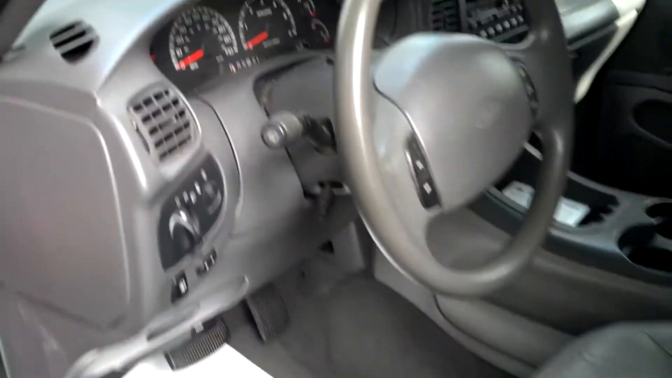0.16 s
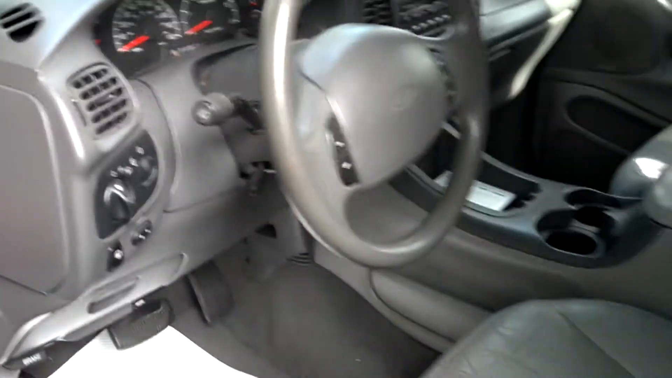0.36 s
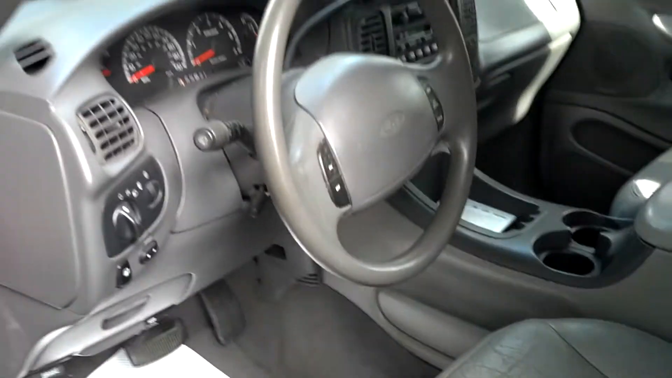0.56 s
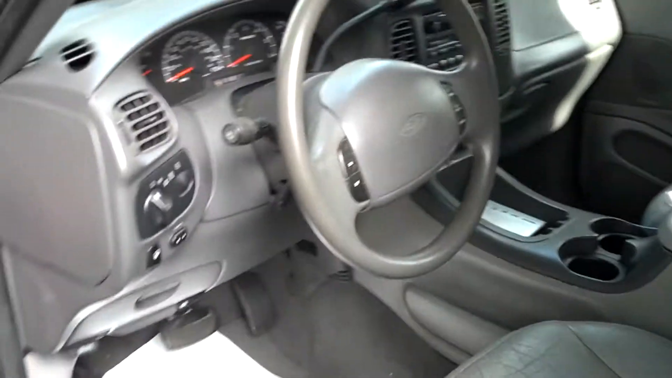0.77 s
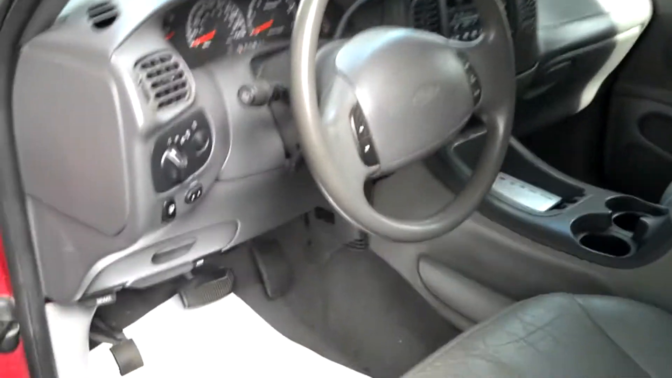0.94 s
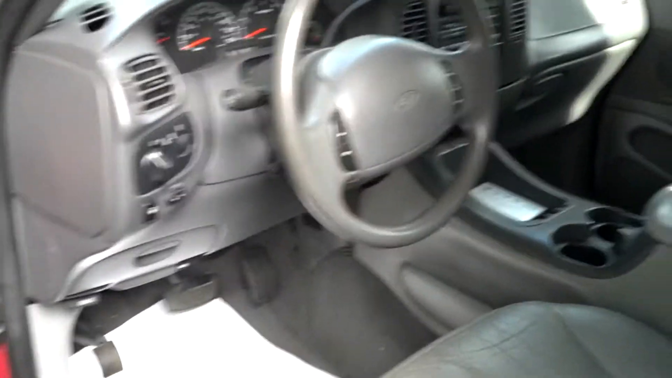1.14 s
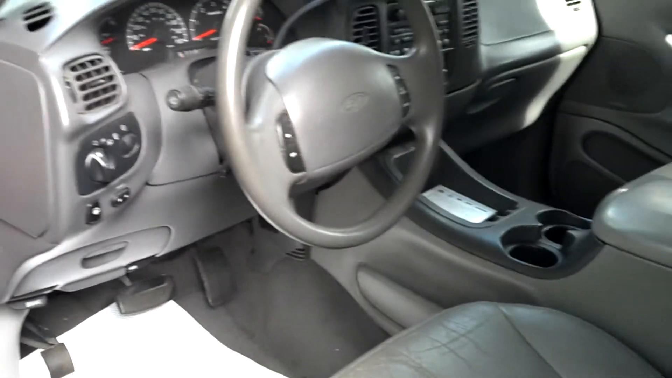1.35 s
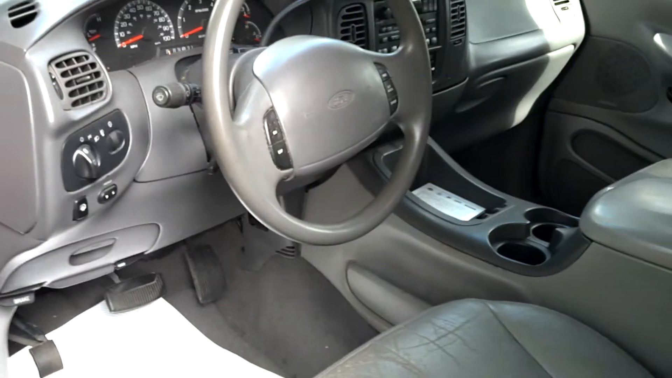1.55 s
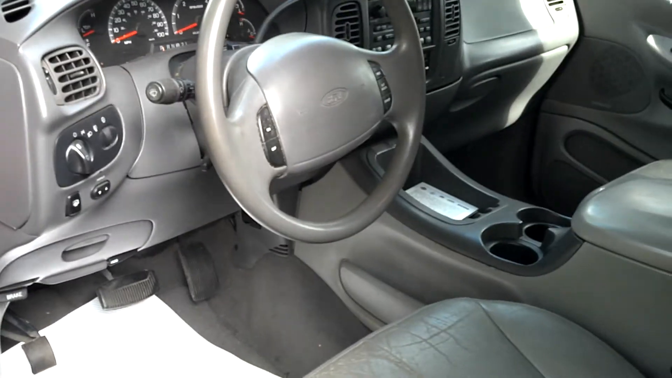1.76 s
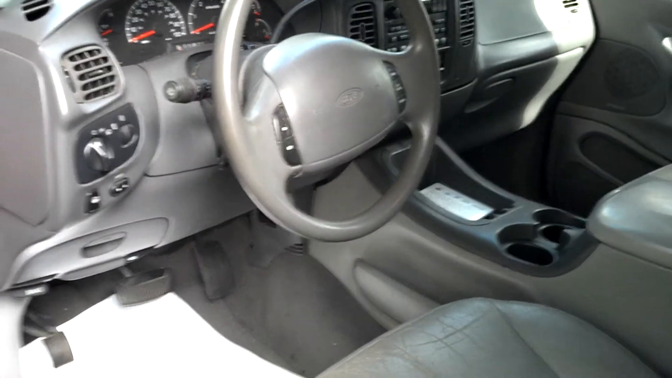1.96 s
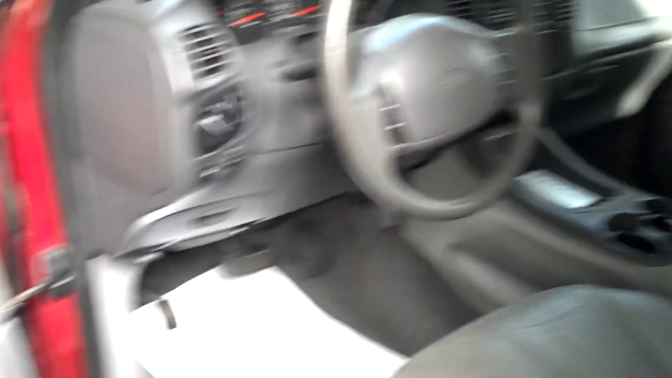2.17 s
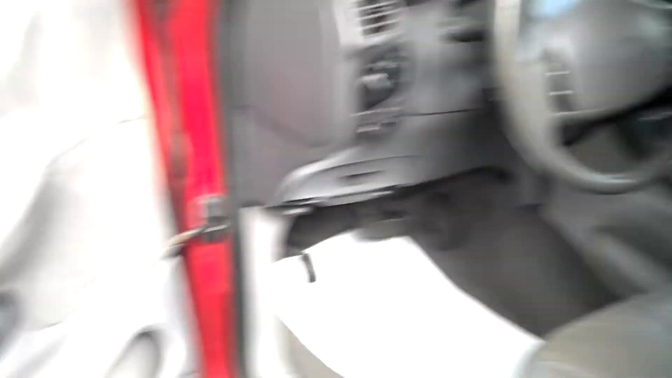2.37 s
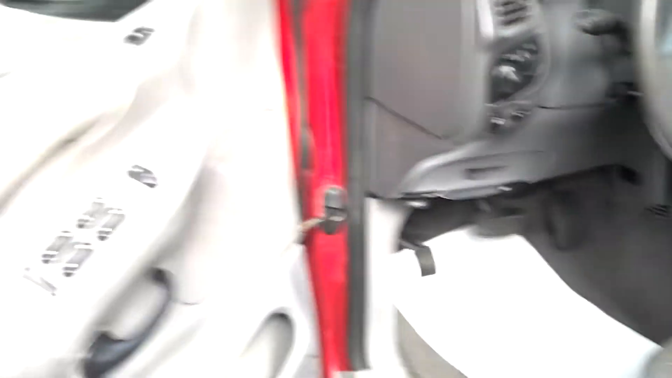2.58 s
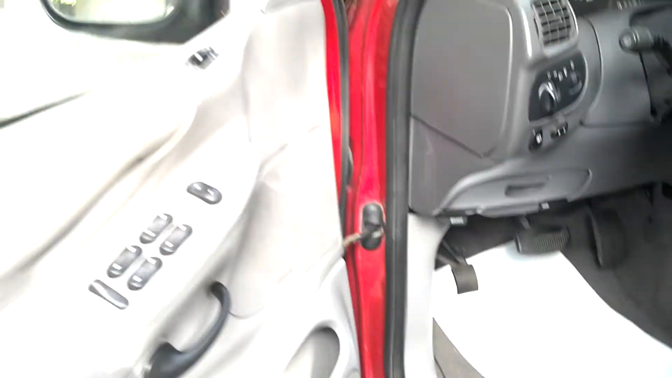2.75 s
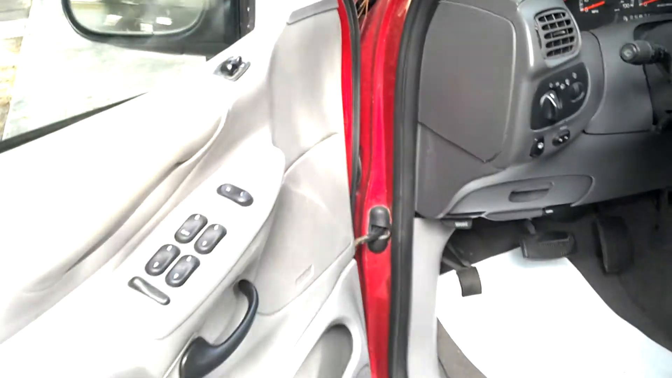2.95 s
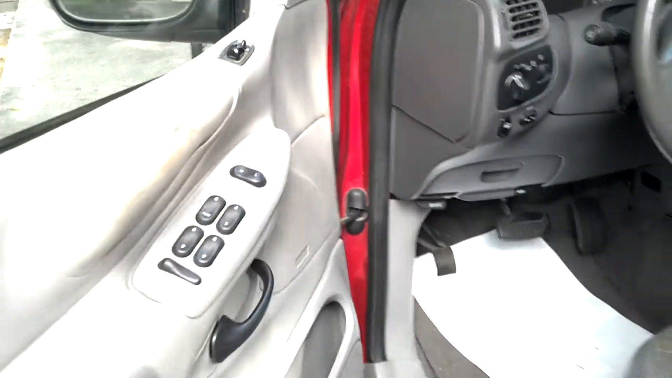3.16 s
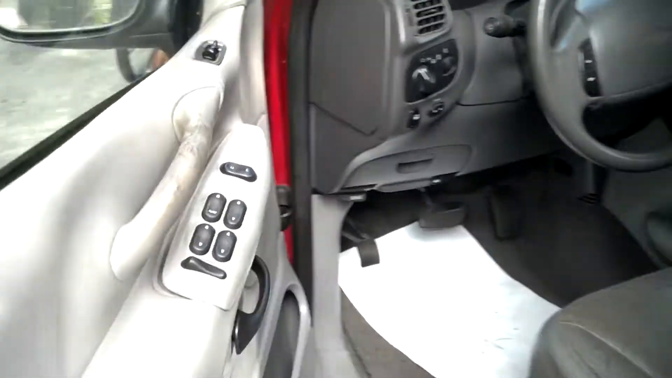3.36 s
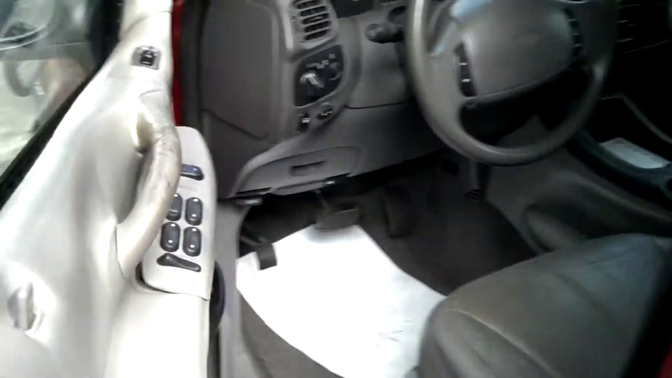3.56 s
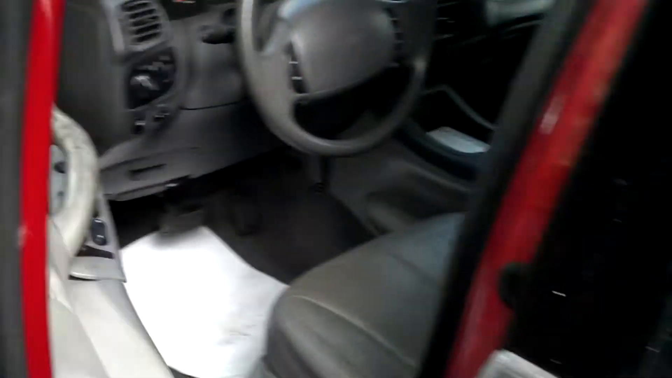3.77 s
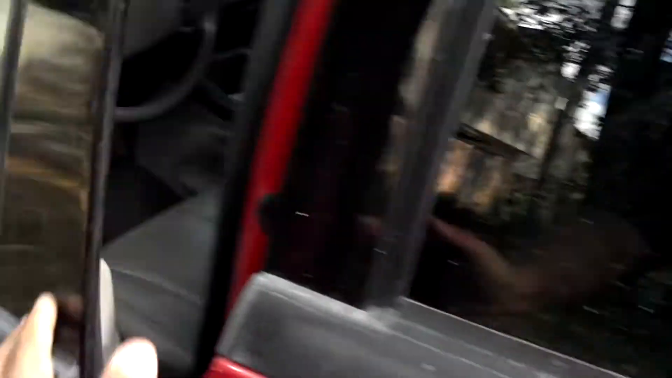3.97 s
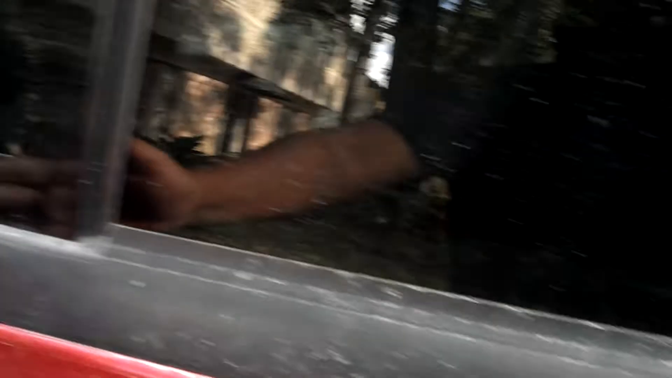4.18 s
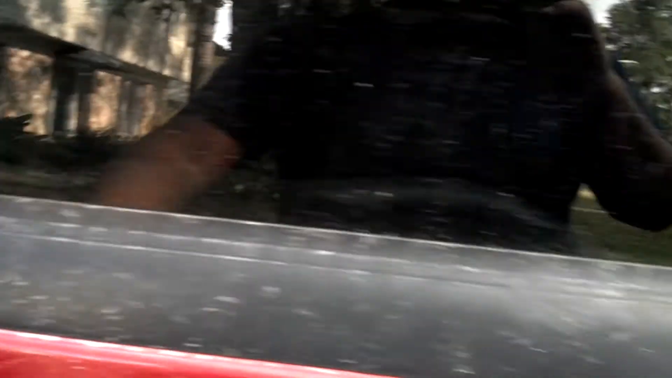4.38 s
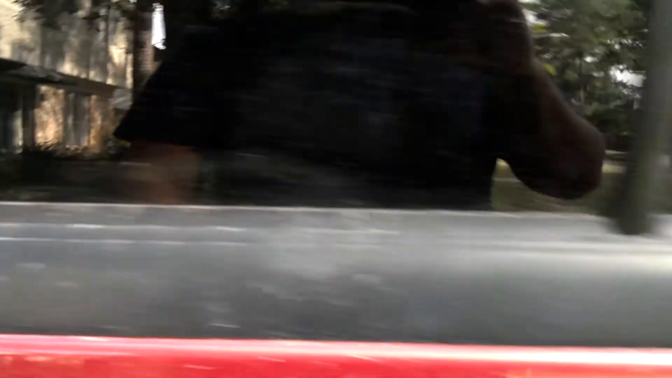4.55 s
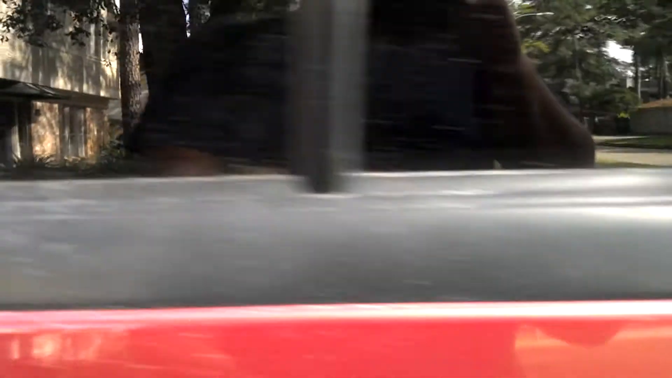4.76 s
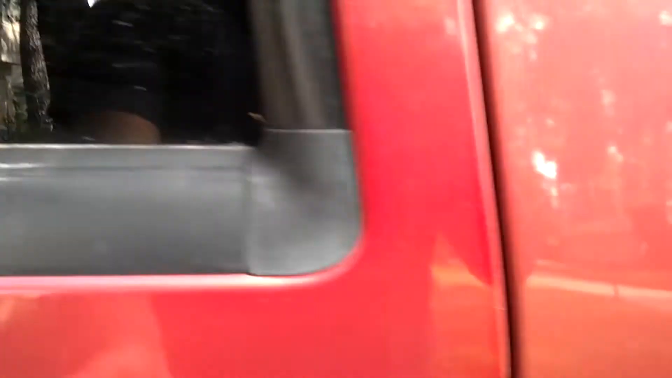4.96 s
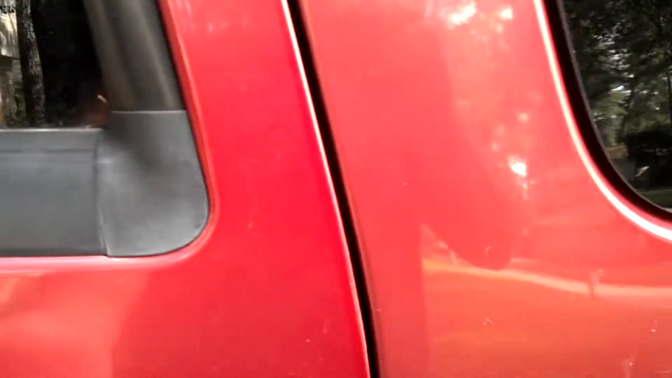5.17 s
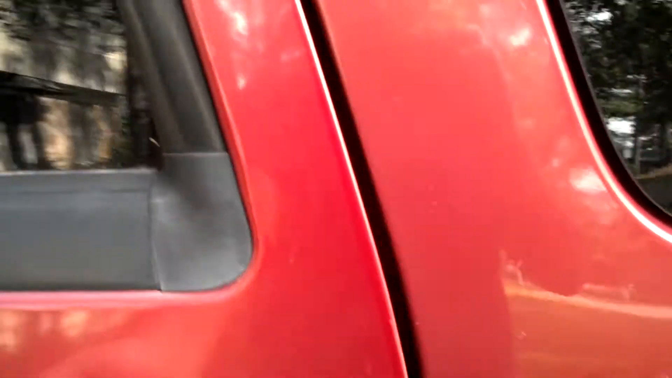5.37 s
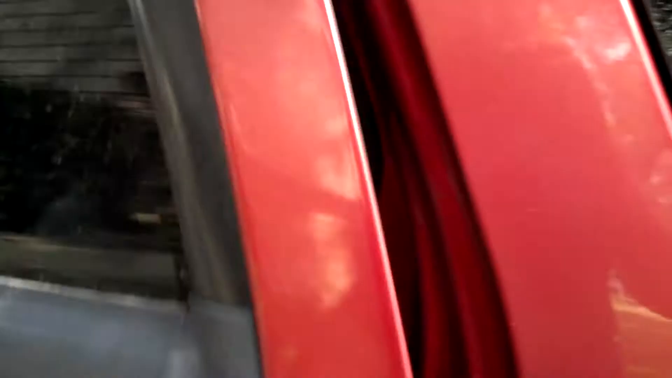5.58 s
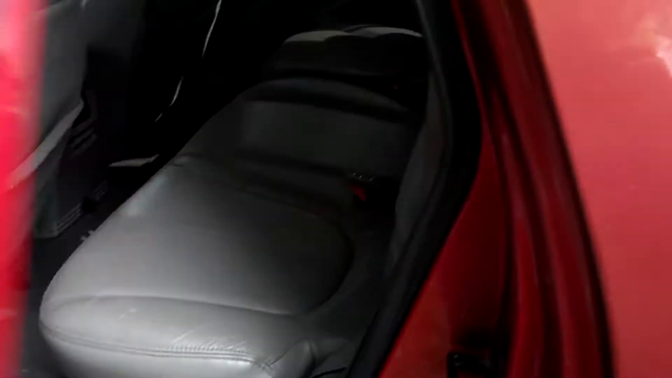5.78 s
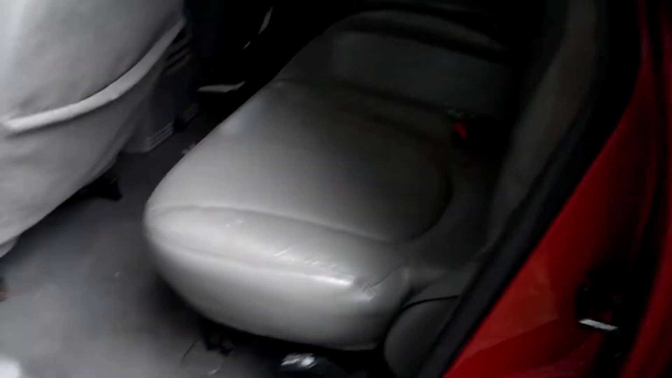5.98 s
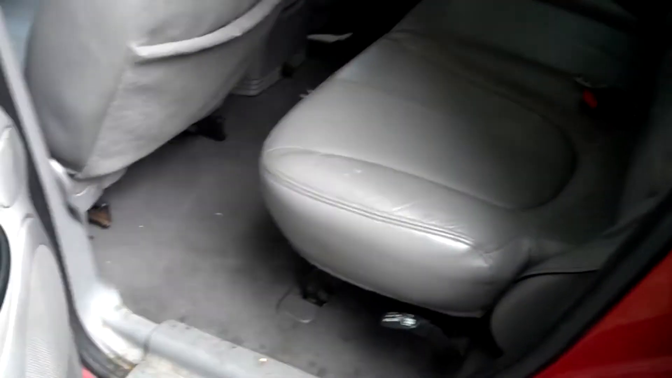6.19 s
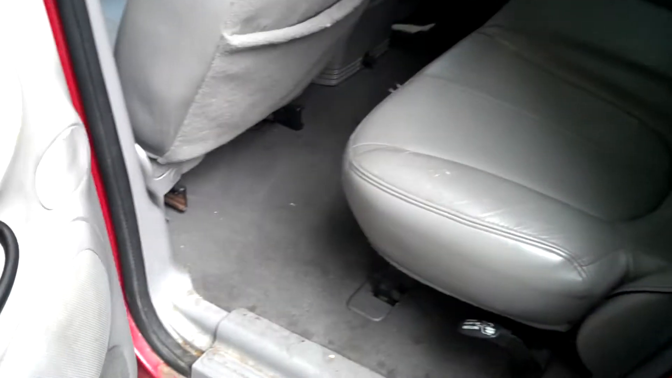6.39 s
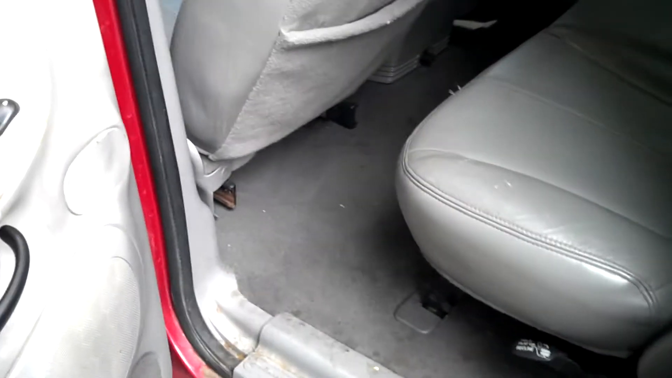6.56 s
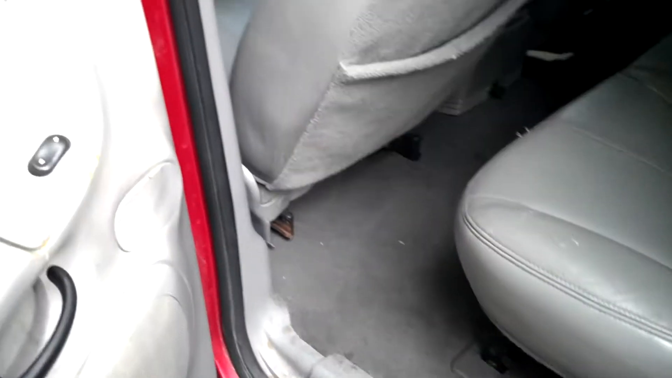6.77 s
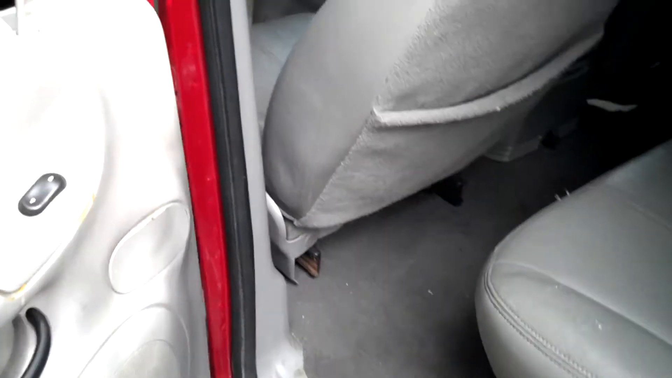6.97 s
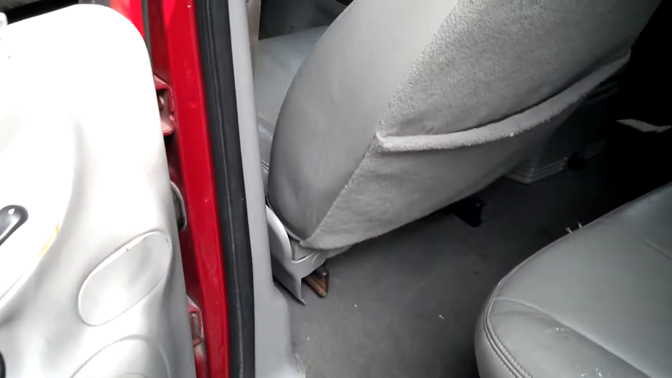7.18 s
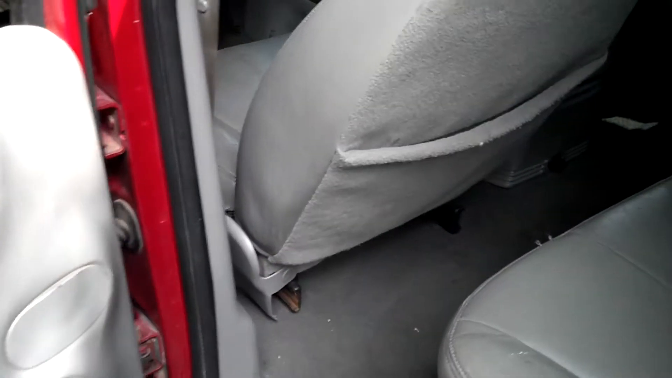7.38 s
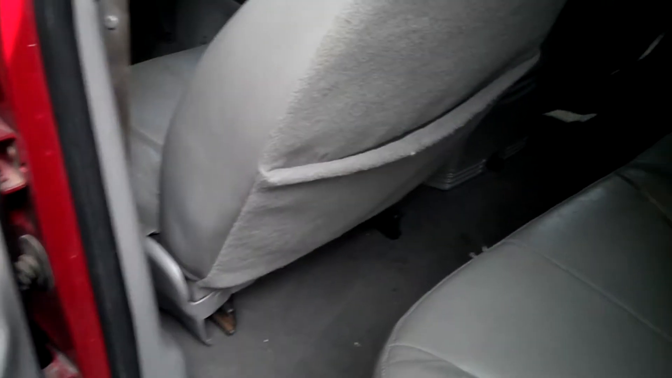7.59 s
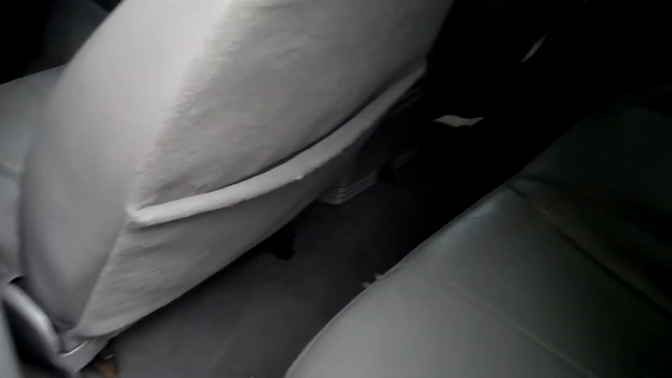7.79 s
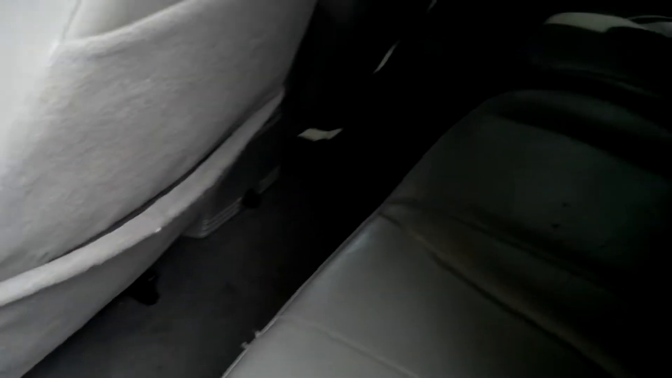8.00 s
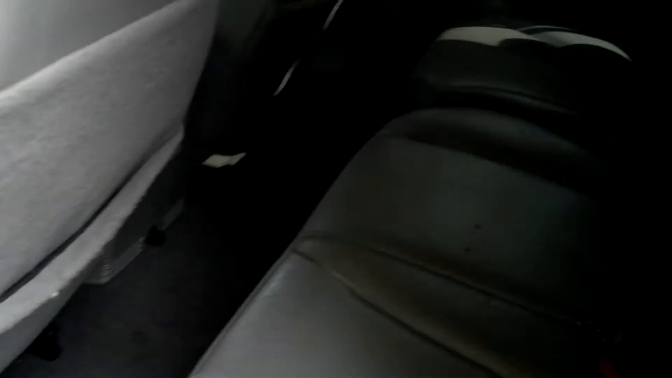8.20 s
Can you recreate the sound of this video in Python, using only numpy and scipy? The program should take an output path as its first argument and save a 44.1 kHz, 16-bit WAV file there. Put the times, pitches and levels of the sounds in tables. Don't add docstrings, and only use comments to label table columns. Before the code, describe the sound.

Beside a parked car outdoors, cicadas hiss steadily over faint traffic and a low machine hum. Fingers and steps thump the handheld microphone. Midway a door slams: latch clack, hard metal bang, quick rebound and trim rattle. The background suddenly drops, the body rocks with dull thuds, then a rear door latch snaps. A distant bird whistles two falling notes as the hiss slowly returns.

```python
import sys
import numpy as np
from scipy import signal
from scipy.fft import rfft, irfft
from scipy.io import wavfile

SR = 44100
rng = np.random.default_rng(int(sys.argv[2]) if len(sys.argv) > 2 else 0)


def magnitude_from_level(level_db):
    exponent = np.asarray(level_db, float) / 20
    return 10 ** exponent


def file_out(sig):
    cols = np.atleast_2d(sig).T
    lim = np.clip(cols, -1, 1)
    pcm = np.round(lim * 32767).astype(np.int16)
    wavfile.write(sys.argv[1], SR, pcm)


N = 363173
GAIN_FALLS_S, SHUT_S = 4.262, 4.29


def rms_one(x):
    return x / np.sqrt(np.mean(x ** 2) + 1e-20)


def at_hz(points, hz, col=1):
    points = np.array(points)
    return np.interp(np.log(hz), np.log(points[:, 0]), points[:, col])


def in_time(rows):
    s, db = np.transpose(rows)
    return magnitude_from_level(np.interp(np.arange(N) / SR, s, db))


def drift(rate):
    r = np.exp(-80 * np.pi * rate / SR)
    slow = signal.lfilter([1], [1, -2 * r, r * r], rng.standard_normal(N // 40 + 2002))
    slow = rms_one(slow[2000:])
    return np.interp(np.arange(N) / 40, np.arange(len(slow)), slow)


def ring(drive, hz, t60):
    r, w = magnitude_from_level(-60 / (t60 * SR)), 2 * np.pi * hz / SR
    return signal.lfilter([0, np.sin(w)], [1, -2 * r * np.cos(w), r * r], drive + 1e-18)


def coloured(source, spectrum):
    hz = np.maximum(np.arange(N // 2 + 1) * SR / N, 1)
    inside = (hz > spectrum[0][0]) & (hz < spectrum[-1][0])
    return rms_one(irfft(rfft(source) * magnitude_from_level(at_hz(spectrum, hz)) * inside, N))


def contacts(table, width_share, dies_s, dies_per_lasts):
    out, t = np.zeros(N), np.arange(SR // 8) / SR
    size = len(table), len(t)
    grit = rng.standard_normal(size) * magnitude_from_level(rng.standard_normal(size))
    for (s, db, lasts, hz), clicks in zip(table, grit):
        low = hz * (np.sqrt(1 + width_share ** 2 / 4) - width_share / 2)
        high = min(low + width_share * hz, 12500)
        band = signal.butter(2, [low, high], "band", fs=SR, output="sos")
        fall_db = -60 * np.maximum(t - lasts, 0) / (dies_s + dies_per_lasts * lasts)
        shape = np.minimum(t / .0004, 1) * magnitude_from_level(fall_db)
        patch = signal.sosfilt(band, shape * clicks) / np.std(signal.sosfilt(band, clicks))
        out[round(s * SR):][:len(t)] += magnitude_from_level(db) * patch
    return out


def struck(drive, modes, ring_db, damping):
    ringing = sum(magnitude_from_level(db) * ring(drive, hz, t60 * damping) for hz, db, t60 in modes)
    return drive + magnitude_from_level(ring_db) * ringing


def thumps(table, cycles, shake_db, shake_s):
    out, t = np.zeros(N), np.arange(SR // 6) / SR
    after = rng.standard_normal((len(table), len(t))) * magnitude_from_level(shake_db - 60 * t / shake_s) * (t > .004)
    after[:, 0] = 1
    for (s, db, hz), clicks in zip(table, after):
        push = np.sin(np.pi * np.minimum(t * hz * 1.25, 1)) ** 2
        blow = -np.diff(ring(push, hz, cycles / hz), prepend=0)
        start = round(s * SR) - np.argmax(np.abs(signal.hilbert(blow)))
        shaken = signal.fftconvolve(blow, clicks)[:len(t)]
        out[start:][:len(t)] += magnitude_from_level(db) * shaken / np.abs(blow).max()
    return out


def door_slam():
    # start in seconds, level in dB, hold in seconds, centre in Hz; the same for the next two.
    striker = [
        (4.2555, -17, 0.0098, 1350),
        (4.256, -26, 0.016, 700),
        (4.2555, -29, 0.011, 2420),
        (4.270, -14, 0.0079, 1000),
        (4.314, -25.5, 0.0066, 940),
    ]
    bang = [
        (4.2655, -18, 0.0045, 4480),
        (4.2722, -8.5, 0.0029, 4440),
        (4.2755, -19, 0.0017, 6540),
        (4.2795, -13.5, 0.0021, 4970),
        (4.285, -37.5, 0.032, 6000),
        (4.3135, -21, .006, 4270),
    ]
    trim = [
        (4.286, -26, 0.0037, 1000),
        (4.293, -33, 0.0044, 1400),
        (4.33, -37, .003, 1300),
        (4.348, -36.5, .0045, 1500),
        (4.372, -42, .003, 900),
        (4.392, -39.5, 0.0063, 1200),
        (4.41, -47, .004, 1100),
        (4.425, -46, 0.0036, 500),
    ]
    # frequency in Hz, level in dB, t60 in seconds.
    panels = [(285, -8, 0.29), (546, -25, 0.38), (747, -1, 0.22), (1020, -12, 0.19), (1230, -33, 0.68),
              (1701, -26, 0.27), (1905, -8, 0.41), (2000, -10, 0.16), (2380, -9, 0.29), (2540, -18, 0.24),
              (2570, -15, 0.29), (2960, -12, 0.21)]
    shut = contacts(striker, 0.67, 0.015, 0.78) + contacts(bang, 1.54, 0.0076, 1.4)
    shut = shut + contacts(trim, 1.46, .009, 1.8)
    tails = door_tail(SHUT_S - 0.01, level_db=-31.5) + door_tail(4.318, level_db=-34)
    return struck(shut, panels, ring_db=-47, damping=0.43) + tails


def door_tail(start_s, level_db):
    # frequency in Hz, level in dB, t60 in seconds.
    decay = [(100, -13, 0.99), (284, -2, 0.5), (700, -4.5, 0.23), (1500, -12.5, 0.49), (3000, -9.5, 0.34),
             (7000, -11.5, 0.33), (14000, -24, 0.24)]
    t, out = np.arange(SR) / SR, np.zeros(N)
    splits = 80 * 2 ** np.arange(0, 7.8, .5)
    rattle = magnitude_from_level(2.5 * np.clip(drift(80.0)[:SR], -2, 1))
    for low, high in zip(splits, splits[1:]):
        sos = signal.butter(2, [low, high], "band", fs=SR, output="sos")
        band = rms_one(signal.sosfilt(sos, rng.standard_normal(SR)))
        hz = np.sqrt(low * high)
        fall_db = at_hz(decay, hz) - 60 * t / at_hz(decay, hz, col=2)
        attack = np.minimum(t / 0.0053, 1)
        out[round(start_s * SR):][:SR] += band * magnitude_from_level(level_db + fall_db) * rattle * attack
    return out


def rear_latch():
    # start in seconds, level in dB, hold in seconds, centre in Hz; the same for the rods.
    release = [
        (5.4345, -36, 0.0042, 2000),
        (5.4391, -15.5, 0.00093, 1150),
        (5.4395, -36, .003, 7000),
        (5.442, -29.5, .011, 520),
        (5.459, -31, 0.0085, 516),
        (5.468, -43, 0.026, 700),
        (5.54, -49.5, 0.019, 400),
    ]
    rods = [
        (5.4395, -21, .004, 1870),
        (5.443, -36, 0.0081, 4500),
        (5.449, -33, 0.011, 1610),
        (5.483, -45, .008, 2300),
    ]
    # frequency in Hz, level in dB, t60 in seconds.
    lever = [(514, -10, 0.18), (667, 0, 0.044), (1123, -21, 0.27), (1540, -24, 0.067), (1670, -11, 0.18),
             (1820, -14.5, 0.37)]
    snap = contacts(release, 1.32, 0.004, 1.8) + contacts(rods, 0.31, 0.0065, 2.4)
    return struck(snap, lever, ring_db=-39.5, damping=0.8)


def small_metal():
    # start in seconds, level in dB, hold in seconds, centre in Hz; the same for the pings.
    ticks = [(.57, -42, 0.011, 1190), (.778, -44.5, 0.015, 1800), (3.46, -45, 0.054, 387),
             (4.24, -38.5, .014, 1300), (4.483, -40, 0.0056, 290), (4.528, -44, .004, 300),
             (5.077, -47.5, 0.0022, 1300), (5.11, -54, .015, 450), (5.155, -53, 0.015, 1500),
             (5.232, -45, .002, 1400), (5.255, -55, .008, 1500), (5.38, -58, 0.0045, 1400),
             (5.904, -50.5, .0068, 600), (5.946, -55.5, 0.027, 1103), (5.98, -51, .0064, 600),
             (6.151, -54, .006, 1200), (6.228, -55, .005, 600), (6.654, -42.5, .012, 405),
             (6.654, -43.5, 0.0065, 1200)]
    pings = [
        (3.685, -50, .011, 2300),
        (5.353, -46.5, .003, 1550),
        (5.39, -44, .004, 1470),
        (5.876, -56.5, .023, 3000),
        (6.73, -56, .006, 1900),
        (6.91, -56, .026, 1600),
        (8.035, -48, .004, 2130),
        (8.035, -51, .004, 1700),
    ]
    return contacts(ticks, 1.24, .012, 1.0) + contacts(pings, 0.2, 0.012, .7)


def dull_blows():
    # time of peak in seconds, peak in dB, frequency in Hz; the same for all four.
    seals = [
        (4.283, -8, 303),
        (4.318, -10, 274),
        (4.357, -26, 250),
        (4.374, -25, 268),
        (5.44, -25, 300),
    ]
    fingers = [
        (0.57, -25, 400),
        (2.151, -28.5, 332),
        (2.358, -19.5, 357),
        (2.632, -20, 354),
        (3.469, -32, 290),
        (6.154, -30.5, 342),
        (6.657, -36, 298),
    ]
    footsteps = [(0.742, -25, 133), (1.382, -28.5, 111), (2.652, -35, 167), (3.061, -38, 154),
                 (5.455, -32, 105), (5.996, -40.5, 151), (6.527, -39, 114), (6.562, -34.5, 117),
                 (6.643, -33.5, 126), (7.016, -39, 111), (7.134, -39, 145), (7.174, -31, 116)]
    rocking = [
        (4.484, -22, 176),
        (4.499, -27.5, 111),
        (4.53, -26, 166),
        (4.721, -36.5, 119),
        (4.804, -22, 141),
        (4.873, -38, 130),
        (4.917, -33, 137),
        (4.957, -34, 108),
        (5.012, -37, 133),
        (5.031, -38, 126),
    ]
    out = thumps(seals, 3.0, -35.0, 0.095) + thumps(fingers, 4.9, -29.5, 0.12)
    return out + thumps(footsteps, 3.1, -36.0, 0.23) + thumps(rocking, 3.4, -31.0, 0.086)


def bird(flutter_db):
    # start in seconds, length in seconds, first Hz, last Hz, level in dB.
    calls = [
        (5.03, 0.13, 1490, 1470, -60),
        (5.148, 0.23, 1245, 1160, -49.5),
        (6.738, .13, 1490, 1460, -53),
        (6.852, .22, 1250, 1156, -48),
    ]
    # partials 1, 2 and 3 in dB.
    partials = [
        (-3, 0, -7),
        (-25, 0, -11),
    ]
    # delay in seconds, level in dB.
    echoes = [(.023, -13), (.065, -7), (.11, -15), (.16, -20)]
    out, flutter = np.zeros(N), [magnitude_from_level(flutter_db * drift(30.0)) for n in range(3)]
    for k, (s, lasts, first_hz, last_hz, db) in enumerate(calls):
        u = np.linspace(0, 1, round(lasts * SR))
        at = slice(round(s * SR), round(s * SR) + len(u))
        phase = 2 * np.pi * np.cumsum(first_hz + (last_hz - first_hz) * u) / SR
        trend_db = [-25 * np.maximum(1 - 2.3 * u, 0), -7.0 * u, -5.0 * u]
        note = 0
        for n, partial_db in enumerate(partials[k % 2]):
            note = note + magnitude_from_level(partial_db + trend_db[n]) * flutter[n][at] * np.sin((n + 1) * phase)
        out[at] += magnitude_from_level(db) * note * np.minimum(u / 0.028, 1) * np.minimum((1 - u) / 0.09, 1)
    return out + sum(magnitude_from_level(db) * np.roll(out, round(lag * SR)) for lag, db in echoes)


def cicadas(fade_db, flicker_db):
    # frequency in Hz, level in dB per Hz.
    chorus = [(1650, -40), (2800, -33.5), (3430, -21.5), (3980, -11.5), (4310, -8), (4800, -9.5),
              (5750, -3.5), (6790, -3), (8480, 0.5), (8990, -2.5), (10600, -15.5), (15600, -30)]
    # time in seconds, level in dB.
    turning = [(0, -28.5), (0.9, -27.5), (2.43, -27.5), (3.7, -29.5), (4.2, -27), (4.45, -29), (5.0, -29.5),
               (5.7, -29.5), (6.15, -32), (7.0, -30.5), (8.24, -29.5)]
    # time in seconds, near cicada against the chorus in dB.
    nearness = [(0, -13), (1.4, -13), (1.9, -16), (6, -18), (8.24, -15)]
    # start in seconds, length in seconds, multiple, dB over the hiss.
    swells = [
        (0.0, 0.54, 29.0, 7.5),
        (.14, 0.41, 27.0, 7),
        (.66, .28, 30.0, 10),
        (.76, 0.99, 17.0, 9.5),
        (1.007, .16, 35.0, 15),
        (1.01, 0.28, 30.0, 8.5),
        (1.08, 0.34, 29.0, 1),
        (1.22, 0.38, 33.0, 8.2),
        (7.93, 0.29, 29.0, 12),
        (7.96, .29, 30.0, 7),
    ]
    click_hz = 263.5 * (1 + 0.000589 * drift(1.97))
    phase = 2 * np.pi * np.cumsum(click_hz) / SR
    near = np.zeros(N)
    for k in range(15, 38):
        near += np.sin(k * phase + rng.uniform(0, 6.7)) * magnitude_from_level(fade_db * drift(3.3))
    near = in_time(nearness) * rms_one(near)
    for s, lasts, multiple, db in list(swells) + brief_swells(count=22):
        start = round(abs(s) * SR)
        shape = signal.windows.tukey(round(lasts * SR), .6)[:N - start]
        at = slice(start, start + len(shape))
        near[at] += magnitude_from_level(db - 24.5) * shape * np.sin(round(multiple) * phase[at])
    far = rng.standard_normal(N) * magnitude_from_level(flicker_db * drift(27.0))
    return in_time(turning) * coloured(far + near, chorus)


def brief_swells(count):
    close_until_s, brief_s, brief_db = 1.2, .2, 5.5
    return [(a * close_until_s, brief_s * (.6 + b), 25 + 10 * c, brief_db + 4.0 * (d - .5))
            for a, b, c, d in rng.random((count, 4))]


def street():
    # frequency in Hz, level in dB per Hz.
    traffic = [(110, -34), (180, -3), (216, -1.5), (354, -6), (420, -8.5), (453, -7.5), (722, -12.5),
               (1930, -14), (2690, -17), (3400, -17), (4420, -33), (7480, -120)]
    # time in seconds, low tone in dB over the street.
    machine = [(0, -3.5), (3.0, -4.5), (4.2, -13), (5, -8), (6.5, -4.5), (8.24, -9.5)]
    t = np.arange(N) / SR
    sound = coloured(rng.standard_normal(N), traffic)
    for hz, gain in [(420.7, in_time(machine)), (1956, magnitude_from_level(-17.5))]:
        wavering = magnitude_from_level(2.2 * drift(9.8)) * np.sin(2 * np.pi * hz * t + 0.63 * drift(5.9))
        sound = sound + gain * wavering
    swing_s, swing_db = 0.13, 6.0
    pushed_db = swing_db * np.exp(-np.abs(t - SHUT_S) / swing_s) * (1 + 1.5 * (t > SHUT_S))
    return magnitude_from_level(-50.5 + 3.5 + pushed_db) * sound


def rumble(lumpy_db):
    # frequency in Hz, level in dB per Hz.
    low_noise = [(25, 3), (50, -12), (90, 3.5), (130, 6.5), (200, -11), (300, -18.5), (450, -43.5)]
    t = np.arange(N) / SR
    lumps = rms_one(coloured(rng.standard_normal(N), low_noise) * magnitude_from_level(lumpy_db * drift(14.0)))
    shudder_db = 12.5 * np.clip(np.minimum(t - 4.33, 5.24 - t) / 0.046, 0, 1)
    return magnitude_from_level(-49 + shudder_db + 2.3 * drift(1.6)) * lumps


def gain_control():
    quick_db, quick_back_s = 7.0, 0.75
    slow_db, creep_db_per_s = 10.5, 1.335
    t = np.arange(N) / SR
    since = np.maximum(t - SHUT_S, 0)
    duck_db = quick_db * np.exp(-since / quick_back_s) + slow_db - creep_db_per_s * since
    return magnitude_from_level(-duck_db * np.interp(t, [GAIN_FALLS_S, SHUT_S], [0, 1]))


def scene():
    door = door_slam() + rear_latch() + small_metal() + dull_blows()
    air = cicadas(fade_db=5.5, flicker_db=0.17) + street() + rumble(lumpy_db=2.0)
    mono = door + bird(flutter_db=2.0) + gain_control() * air
    return np.array([mono, mono])


def low_pass(x):
    return signal.sosfilt(signal.butter(12, 15790, fs=SR, output="sos"), x)


def record(dry):
    cut = signal.sosfilt(signal.butter(2, 60, "high", fs=SR, output="sos"), dry)
    hiss = magnitude_from_level(-66) * np.diff(rng.standard_normal(N + 1))
    return low_pass(0.79 * np.tanh(cut / .8) + hiss)


dry = scene()
out = record(dry)
file_out(out)
```